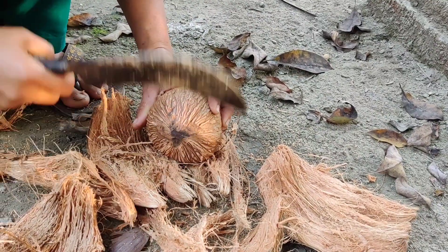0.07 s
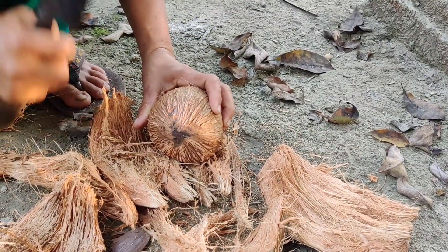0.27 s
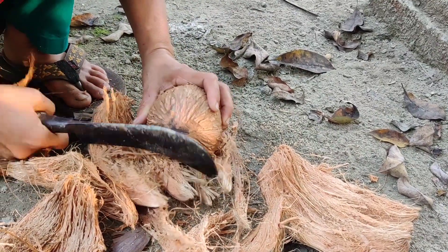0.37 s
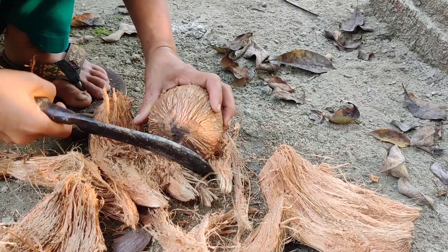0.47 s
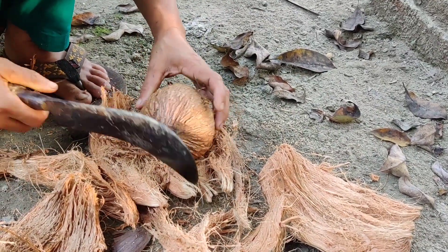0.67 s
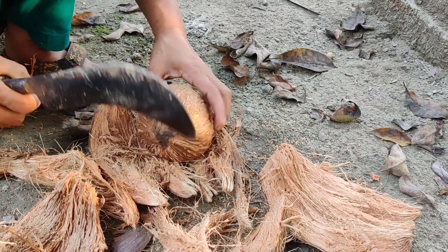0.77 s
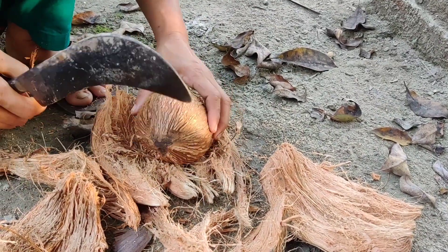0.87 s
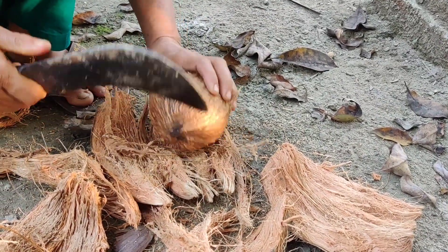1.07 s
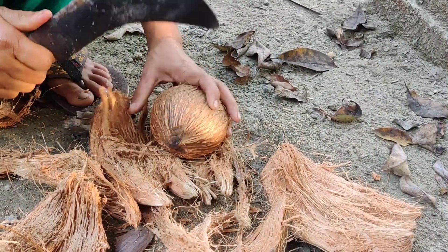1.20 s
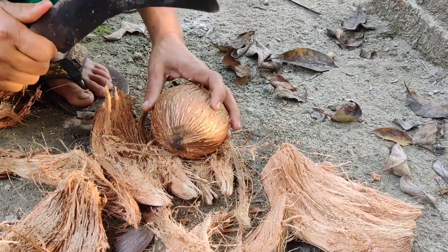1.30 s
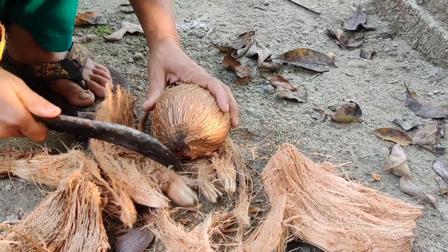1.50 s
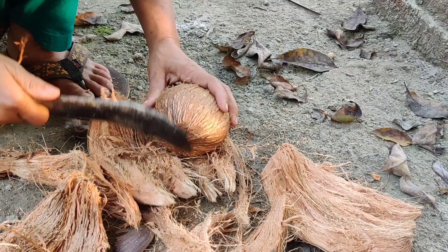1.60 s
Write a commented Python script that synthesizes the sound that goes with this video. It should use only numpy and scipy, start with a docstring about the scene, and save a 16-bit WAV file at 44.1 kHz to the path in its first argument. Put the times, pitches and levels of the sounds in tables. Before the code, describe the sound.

Two hard, woody blade cracks on a coconut shell, close up outdoors, amid soft fibre rustles

```python
"""A heavy blade knocks twice on a hand-held coconut, close up, in an open yard.
Each blow is a noise crack plus ringing modes of shell and steel, a glancing second touch, a wall and a yard echo;
low pulses thud through the husk pile. Shaped noise makes slow swishes of dry fibres and soft rustles,
sparse grains and short bursts crackle nearby, and gliding sines chirp faintly over a low outdoor rumble."""
import sys
import numpy as np
from scipy import signal
from scipy.fft import rfft, irfft, next_fast_len
from scipy.io import wavfile

SR = 44100
rng = np.random.default_rng(int(sys.argv[2]) if len(sys.argv) > 2 else 0)


def master(y):
    """Save y as 16-bit WAV."""
    cut = np.clip(np.atleast_2d(y).T, -1, 1)
    pcm = np.round(cut * 32767)  # scale
    wavfile.write(sys.argv[1], SR, pcm.astype(np.int16))


N = 72765  # samples, 1.65 s


def amp(db):
    """Amplitude factor for a level in dB."""
    return 10 ** (np.asarray(db) / 20)


def unit(x):
    """x scaled to an rms of 1."""
    return x / np.sqrt(np.mean(x ** 2) + 1e-20)


def along(points, hz):
    """Values between (f/Hz, value) points on a log frequency axis."""
    f, values = np.transpose(points)
    return np.interp(np.log(hz + 1), np.log(f + 1), values)


def since(s):
    """Seconds since s, zero before it."""
    return np.maximum(np.arange(N) / SR - s, 0)


def sides(db):
    """Left and right gains for a left-minus-right level difference."""
    return amp(np.array([[.5], [-.5]]) * db)


def filtered(x, response):
    """x through a frequency response, zero-padded so that the end does not wrap round."""
    size = next_fast_len(N + SR // 2)
    hz = np.fft.rfftfreq(size, 1 / SR)
    return irfft(rfft(x, size) * response(hz), size)[..., :N]


def causal(x, gain):
    """x through a minimum-phase filter with this gain, so that nothing sounds ahead of an attack."""
    def response(hz):
        # fold the cepstrum of the gain onto positive time
        cepstrum = irfft(np.log(gain(hz) + 1e-6))
        half = cepstrum.shape[-1] // 2
        cepstrum[..., 1:half] *= 2
        cepstrum[..., half + 1:] = 0
        return np.exp(rfft(cepstrum))
    return filtered(x, response)


# Left-right likeness of spread-out noise: f/Hz, correlation
NOISE_LIKENESS = [(60, 0.99), (300, 0.87), (700, 0.36), (1500, 0.14), (15000, 0.077)]


def noise(spectrum, likeness=NOISE_LIKENESS, tilt_db=0, peaks=()):
    """Stereo noise of rms 1 with a spectrum, a tilt per octave and narrow resonances."""
    def response(hz):
        db = along(spectrum, hz) + tilt_db * np.log2(hz + 1)
        for centre_hz, width_hz, peak_db in peaks:
            db = db + peak_db / (1 + (2 * (hz - centre_hz) / width_hz) ** 2)
        # the angle between mid and side sets the correlation of left and right
        angle = np.arccos(np.clip(along(likeness, hz), -1, 1)) / 2
        return amp(db) * np.array([np.cos(angle), np.sin(angle)])
    mid, side = filtered(rng.standard_normal((2, N)), response)
    return unit(np.array([mid + side, mid - side]))


def fade(t, t60):
    """Exponential decay from 1, down 60 dB at t60."""
    return np.exp(-np.log(1000) * t / t60)


def dying(x, t, t60s):
    """x split into overlapping bands, each dying at its own speed."""
    centres = [hz for hz, _ in t60s]
    out = 0
    for weights, (_, t60) in zip(np.eye(len(t60s)), t60s):
        band = filtered(x, lambda hz: along(list(zip(centres, weights)), hz))
        out = out + band * fade(t, t60)
    return out


STROKE_SHAPE = 1.666  # exponent: 2 is a bell, 1 a pointed peak


def swell(s, rise, fall):
    """A stroke's level: up to 1 at s and down again, at about half one rise before and one fall after."""
    t = np.arange(N) / SR - s
    distance = np.abs(t / np.where(t < 0, rise, fall))
    return np.exp(-.5 * distance ** STROKE_SHAPE * np.sqrt(2))


# Colour of the yard's echo: f/Hz, relative level/dB per Hz
ECHO_SPECTRUM = [(150, -22), (700, -8), (1300, -4), (2500, -2.5), (5500, 4.5), (9000, -5.5), (15000, -1)]
# Decay of the echo by band: f/Hz, t60/s
ECHO_DECAY = [(150, .2), (800, 0.3), (2500, 0.33), (5500, 0.21), (10000, 0.23), (15000, 0.11)]


def yard(x):
    """The diffuse answer of ground and walls: x convolved with a noise tail that swells in and dies by band."""
    t = since(0)
    build_up = 1 - np.exp(-t / 0.0053)
    tail = dying(noise(ECHO_SPECTRUM), t, ECHO_DECAY) * build_up
    return signal.fftconvolve(x, tail / np.linalg.norm(tail[0]), axes=1)[:, :N]


# Low outdoor rumble: f/Hz, relative level/dB per Hz
RUMBLE_SPECTRUM = [(20, 3.5), (38, 1.5), (60, -4), (125, -1), (200, -7.5), (400, -14), (1000, -30),
                   (3000, -61)]
# Slow level ride of the rumble: t/s, level/dB
RUMBLE_RIDE = [(0, -61.5), (.55, -52.5), (.68, -52.5), (.82, -53), (.92, -53.5), (1.25, -64), (1.65, -55.5)]
# Faint air: f/Hz, relative level/dB per Hz
AIR_SPECTRUM = [(100, 13), (450, -6), (680, 4), (900, -2.5), (1500, -3.5), (3300, -4), (4500, 0.5),
                (5600, -6.5), (7000, -12.5), (10000, -17.5), (15500, -15)]
# Two thin resonances in the air: f/Hz, width/Hz, boost/dB
AIR_RESONANCES = [(697, 21, 5.5), (4500, 62, 7.5)]
AIR_DB = -54.5


def background():
    """Low noise that rides slowly in level, under steady faint air with two thin resonances."""
    rumble_db = np.interp(since(0), *np.transpose(RUMBLE_RIDE))
    rumble = amp(rumble_db) * noise(RUMBLE_SPECTRUM)
    air = amp(AIR_DB) * noise(AIR_SPECTRUM, peaks=AIR_RESONANCES)
    return rumble + air


# Chirps: start t/s, length/s, start f/Hz, end f/Hz, level/dB
BIRD_CHIRPS = [(.129, .010, 5300, 6100, -55), (.139, .028, 2250, 3750, -49), (.143, .015, 4600, 6100, -48),
               (.163, .032, 4700, 4550, -55), (1.181, .028, 4250, 4560, -48)]
BIRD_ECHO_DB = -5


def bird():
    """Quick far whistles: sine glides that swell and close, with their echo from the yard."""
    song = np.zeros(N)
    for s, length, start_hz, end_hz, db in BIRD_CHIRPS:
        progress = np.minimum(since(s) / length, 1)
        pitch_hz = start_hz * (end_hz / start_hz) ** progress
        whistle = np.sin(2 * np.pi * np.cumsum(pitch_hz) / SR)
        song += amp(db) * np.sin(np.pi * progress) * whistle
    return song + amp(BIRD_ECHO_DB) * yard(np.array([song, song]))


# Dull tick: f/Hz, relative level/dB per Hz
TICK_SPECTRUM = [(300, -35), (800, -24), (1200, -2), (2200, 0), (3500, -5), (6500, -13), (8000, -35)]
TICK_S, TICK_DB, TICK_T60 = .0335, -37.5, 0.017  # start/s, level/dB, t60/s


def tick():
    """One light, dull tick: a burst of noise that starts at once and dies quickly."""
    t = since(TICK_S)
    return amp(TICK_DB) * noise(TICK_SPECTRUM, BLOW_LIKENESS) * (t > 0) * fade(t, TICK_T60)


# The hand shifts the nut on the pile: peak t/s, level/dB, rise/s, fall/s
NUT_SHIFTS = [(.54, -55, .008, .008), (.615, -56, .02, .04), (1.012, -54, .008, .01)]
# Dull rustle of a shift: f/Hz, relative level/dB per Hz
SHIFT_SPECTRUM = [(60, -8), (200, 0), (400, -4), (750, -1.5), (1500, -6), (3000, -28), (8000, -45)]


def shifts():
    """A soft, dull rustle of swelling noise as the nut moves on the husks."""
    movement = sum(amp(db) * swell(s, rise, fall) for s, db, rise, fall in NUT_SHIFTS)
    return movement * noise(SHIFT_SPECTRUM)


# Husk rubbed by hand and blade: peak t/s, level/dB, rise/s, fall/s
HUSK_RUBS = [(0.438, -48, 0.041, 0.036), (0.485, -45.5, 0.0072, 0.024), (.549, -46.5, .014, 0.016),
             (1.008, -40.5, 0.011, 0.01), (1.046, -48, 0.017, 0.024), (1.1, -50, 0.023, 0.035),
             (1.31, -44, 0.011, 0.09), (1.54, -53.5, 0.014, 0.021)]
# Single fibres snapping: t/s, level/dB
FIBRE_SNAPS = [(.471, -44), (0.5, -44), (0.52, -39), (.559, -62), (1.0098, -33), (1.118, -41),
               (1.2072, -47.5)]
# Colour of husk grains and snaps: f/Hz, relative level/dB per Hz
HUSK_SPECTRUM = [(150, -10), (700, -4), (1300, -8.5), (4000, -4), (7000, -7), (9500, -1.5), (12000, -4.5),
                 (15500, -3.5)]
GRAINS_PER_S, GRAIN_SHARE = 1900, 0.46  # average rate, share of the crackle's power
SNAP_T60 = .008  # s


def husk():
    """Close fibres crackle in tiny random grains over smooth noise; now and then one snaps."""
    grains = (rng.random(N) < GRAINS_PER_S / SR) * rng.standard_normal((2, N))
    grains = unit(causal(grains, lambda hz: amp(along(HUSK_SPECTRUM, hz))))
    crackle = np.sqrt(GRAIN_SHARE) * grains + np.sqrt(1 - GRAIN_SHARE) * noise(HUSK_SPECTRUM)
    rubbing = sum(amp(db) * swell(s, rise, fall) for s, db, rise, fall in HUSK_RUBS)
    snapping = sum(amp(db) * (since(s) > 0) * fade(since(s), SNAP_T60) for s, db in FIBRE_SNAPS)
    return rubbing * crackle + snapping * noise(HUSK_SPECTRUM)


# Strokes of dry fibres: peak t/s, hiss level/dB, rise/s, fall/s, brightness/dB per octave
FIBRE_STROKES = [(0.339, -38, 0.032, 0.043, -2), (0.763, -31, 0.1, 0.074, 1),
                 (1.35, -36.5, 0.077, 0.044, -2), (1.45, -38.5, 0.035, 0.044, 0.5)]
# Hiss of the fibres: f/Hz, relative level/dB per Hz
SWISH_SPECTRUM = [(200, -27.5), (900, -21), (1500, -17), (2150, -7.5), (2600, -8), (3500, -8.5), (4200, 2),
                  (5100, -1), (5700, -4.5), (6400, -8.5), (7100, -13), (8600, -15), (9300, -11),
                  (10800, -23.5), (13000, -14.5), (15500, -24.5)]
# Narrow resonances in the hiss: f/Hz, width/Hz, boost/dB
SWISH_RESONANCES = [(1727, 80, 9.5), (2200, 53, 11), (2923, 27, 10), (4170, 150, 1.5), (4760, 130, 0),
                    (4800, 47, -3.5), (5590, 39, 8.5)]
# Duller body of the swish: f/Hz, relative level/dB per Hz
SWISH_BODY_SPECTRUM = [(200, -16.5), (800, -8), (1400, -5), (2200, -0.5), (3000, -4), (5000, -23.5),
                       (12000, -49)]
BODY_DB, BODY_GROWTH = -17, 0.44  # level against the hiss at the peak; exponent of effort
REFLECTIONS_DB, REFLECTIONS_T60 = -2, 0.061  # level against direct sound; s


def swishes():
    """Many dry fibres brushing at once make a resonant hiss under each stroke, rippled by reflections."""
    out = np.zeros((2, N))
    for s, db, rise, fall, tilt_db in FIBRE_STROKES:
        effort = swell(s, rise, fall)
        hiss = effort * noise(SWISH_SPECTRUM, tilt_db=tilt_db, peaks=SWISH_RESONANCES)
        # the body grows more slowly with effort, so gentle brushing is duller
        body = effort ** BODY_GROWTH * noise(SWISH_BODY_SPECTRUM)
        out += amp(db) * (hiss + amp(BODY_DB) * body)
    paths = rng.standard_normal((2, N)) * fade(since(0), REFLECTIONS_T60)
    reflected = signal.fftconvolve(out, paths / np.linalg.norm(paths[0]), axes=1)[:, :N]
    return (out + amp(REFLECTIONS_DB) * reflected) / np.hypot(1, amp(REFLECTIONS_DB))


# The nut settling on the husks: start t/s, approximate peak level/dB
NUT_THUDS = [(.2365, -31), (.242, -37), (.254, -38), (1.3815, -32), (1.007, -40)]
THUD_PULSE_S = .0009  # time scale of the pulse


def thuds():
    """The nut is pushed into the soft pile of husks: one low push-and-return pulse each time."""
    out = np.zeros(N)
    for s, db in NUT_THUDS:
        u = since(s) / THUD_PULSE_S
        out += amp(db) * 2 * u * (2 - u) * np.exp(-u)
    return out


MODE_WAVER, MODE_WAVER_HZ = .7, 350  # phase spread/rad at each new value, new values per second


def waver():
    """A quick random drift of phase that roughens a ringing mode."""
    knots = rng.standard_normal(int(N * MODE_WAVER_HZ / SR) + 2)
    position = np.arange(N) * MODE_WAVER_HZ / SR
    return MODE_WAVER * np.interp(position, np.arange(len(knots)), knots)


# Crack of the edge biting in: f/Hz, relative level/dB per Hz
CRACK_SPECTRUM = [(100, -15.5), (400, -36.5), (650, -4.5), (1200, -12.5), (1500, -7.5), (2300, -4.5),
                  (3800, 0.5), (5600, -2.5), (7000, -7.5), (9500, -5), (11500, -5), (13000, -1),
                  (15500, -12.5)]
# Decay of the crack by band, before the blow's length factor: f/Hz, t60/s
CRACK_DECAY = [(300, 0.016), (1000, 0.025), (4000, 0.03), (14000, 0.022)]
# Shell and blade, before the ring's length factor and the blow's balance:
# f/Hz, level/dB at the first strike point, level/dB at the second, t60/s, left minus right/dB
RING_MODES = [(275.5, -35.5, -36, 0.051, -10.5), (591, -23.5, -26.5, 0.022, -14),
              (764, -19, -23.5, 0.033, 1), (850, -32.5, -34.5, 0.026, -8), (1070, -18.5, -15, 0.02, -4),
              (1252, -16, -18.5, 0.028, 3.5), (1838, -18.5, -21, 0.036, 7), (2005, -20.5, -50, 0.017, 17.5),
              (2766, -11.5, -48, 0.017, -15), (3440, -13, -21.5, 0.031, 7.5), (4336, -9.5, -12.5, 0.018, 6),
              (5940, -32, -13, 0.015, 4), (7880, -19, -20, .04, -3.5), (11790, -10.5, -24.5, .032, -7),
              (13860, -18.5, -17.5, 0.016, 11.5), (15500, -27, -40, 0.05, 10)]
# Left-right balance of a blow: f/Hz, left minus right/dB
BLOW_BALANCE = [(100, 14.5), (300, 1), (700, 9), (2000, 3.5), (4500, 0.5), (7500, -0.5), (11500, -1),
                (14500, 15)]
# Left-right likeness of a blow: f/Hz, correlation
BLOW_LIKENESS = [(100, .95), (1000, 0.99), (2500, 0), (15000, 0.3)]
CRACK_ATTACK_S, CRACK_HOLD_S, MODE_ATTACK_S = 0.00036, 0.0013, 0.00073
WAVER_FULL_HZ = 2980  # lower modes are steadier


def contact(s, point, crack_db, tilt_db, crack_length, ring_length=1):
    """Steel meets shell: a noise crack and the modes as they ring from that strike point."""
    t = since(s)
    decay_time = since(s + CRACK_HOLD_S) / crack_length
    crack = dying(noise(CRACK_SPECTRUM, BLOW_LIKENESS, tilt_db), decay_time, CRACK_DECAY)
    crack = amp(crack_db) * crack * np.minimum(t / CRACK_ATTACK_S, 1)
    ring = np.zeros((2, N))
    for k, (hz, *levels_db, t60, pan_db) in enumerate(RING_MODES):
        # a phase offset between the sides gives each mode its stereo width
        spread = np.arccos(np.clip(along(BLOW_LIKENESS, hz), -1, 1))
        roughness = waver() * min(hz / WAVER_FULL_HZ, 1)
        phase = -np.pi / 2 * k + roughness + np.array([[0], [spread]])
        tone = np.sin(2 * np.pi * hz * t + phase) * fade(t, t60 * ring_length)
        ring += amp(levels_db[point]) * sides(pan_db) * tone
    ring = ring * (1 - np.exp(-t / MODE_ATTACK_S))
    return causal(np.array([crack, ring]), lambda hz: sides(along(BLOW_BALANCE, hz)))


# Blade blows: t/s, crack level/dB, brightness/dB per octave, echo level/dB,
# low ring level/dB before its rise and decay, length of the crack as a factor
BLADE_BLOWS = [(0.2193, -11, -1.5, -13, -40, 1.0), (1.3487, -11, -0.1, -11.5, -44.5, 0.99)]
# The edge touches again as it glances off: t/s, peak filter level/dB, centre f/Hz,
# half width/octaves, length of the ring as a factor
EDGE_GLANCES = [(.234, -11, 780, 1.0, .55), (1.3655, -4, 2300, .42, 1.2)]
GLANCE_CRACK_DB = -8  # crack of a glance against its blow, ahead of the filter
WALL_DELAY_S, WALL_DB = 0.016, -18.5
RING_ECHO_DB = -14  # ring against crack in what is sent to the yard
LOW_RING_HZ, LOW_RING_T60, LOW_RING_RISE_S = 120.9, .7, 0.058


def blows():
    """The edge bites, glances off and touches again; a near wall and the yard answer, and a low ring lingers."""
    out = np.zeros((2, N))
    for point, (blow, glance) in enumerate(zip(BLADE_BLOWS, EDGE_GLANCES)):
        s, crack_db, tilt_db, echo_db, low_db, length = blow
        again_s, again_db, centre_hz, octaves, ring_length = glance
        crack, ring = contact(s, point, crack_db, tilt_db, length)
        direct = crack + ring

        again = sum(contact(again_s, point, crack_db + GLANCE_CRACK_DB, tilt_db, length, ring_length))
        again = causal(again, lambda hz: amp(again_db) / (1 + (np.log2((hz + 1) / centre_hz) / octaves) ** 2))

        # a phase slope delays the wall's answer
        wall = filtered(direct, lambda hz: np.exp(-2j * np.pi * hz * WALL_DELAY_S))
        echo = yard(crack + amp(RING_ECHO_DB) * ring)

        t = since(s)
        low_rise = 1 - np.exp(-t / LOW_RING_RISE_S)
        low = np.sin(2 * np.pi * LOW_RING_HZ * t) * fade(t, LOW_RING_T60) * low_rise
        out += direct + again + amp(WALL_DB) * wall + amp(echo_db) * echo + amp(low_db) * low
    return out


def scene():
    """Blows and handling up close, over the quiet yard."""
    return blows() + thuds() + swishes() + husk() + shifts() + tick() + bird() + background()


# Colour difference of the microphone pair: f/Hz, left minus right/dB
MICROPHONE_BALANCE = [(60, 0.5), (300, 2), (1200, -0.5), (2400, 2.5), (4400, 3.5), (6000, 9.5),
                      (8000, -7.5), (9300, -12), (10500, -17.5), (12000, -5.5), (13500, -2.5), (15500, 4.5)]
CEILING = .8  # amplitude that the soft ceiling approaches
TOP_HZ = 15900  # band limit


def record(dry):
    """Two differently coloured microphones, a soft ceiling and a steep band limit."""
    x = causal(dry, lambda hz: sides(along(MICROPHONE_BALANCE, hz)))
    x = x / (1 + np.abs(x / CEILING) ** 6) ** (1 / 6)
    return filtered(x, lambda hz: 1 / np.sqrt(1 + (hz / TOP_HZ) ** 160))


dry = scene()
out = record(dry)
master(out)
```